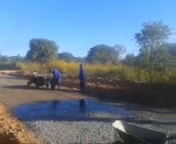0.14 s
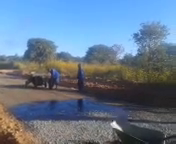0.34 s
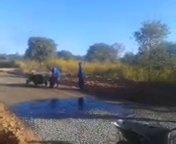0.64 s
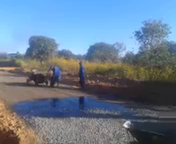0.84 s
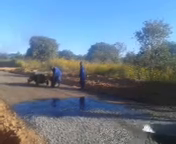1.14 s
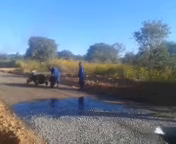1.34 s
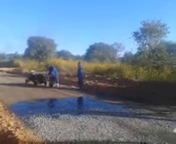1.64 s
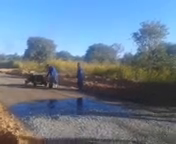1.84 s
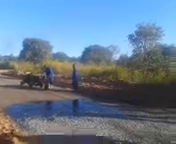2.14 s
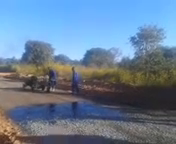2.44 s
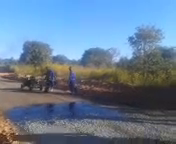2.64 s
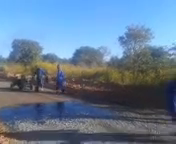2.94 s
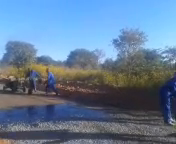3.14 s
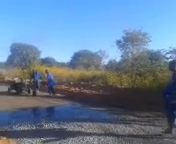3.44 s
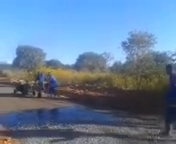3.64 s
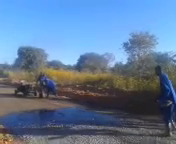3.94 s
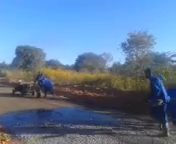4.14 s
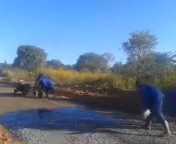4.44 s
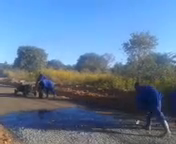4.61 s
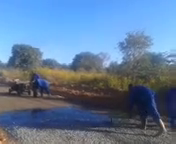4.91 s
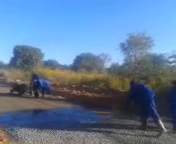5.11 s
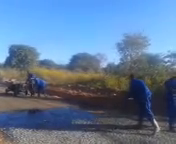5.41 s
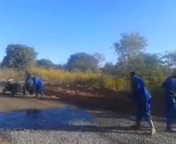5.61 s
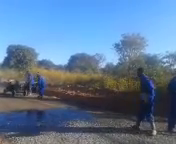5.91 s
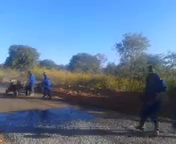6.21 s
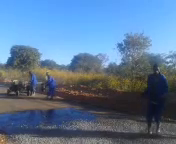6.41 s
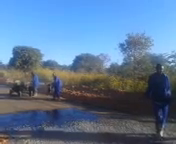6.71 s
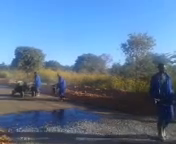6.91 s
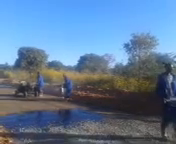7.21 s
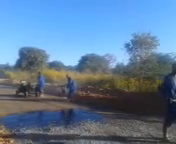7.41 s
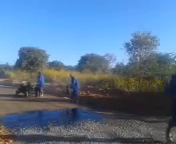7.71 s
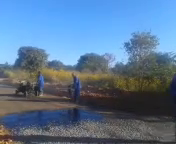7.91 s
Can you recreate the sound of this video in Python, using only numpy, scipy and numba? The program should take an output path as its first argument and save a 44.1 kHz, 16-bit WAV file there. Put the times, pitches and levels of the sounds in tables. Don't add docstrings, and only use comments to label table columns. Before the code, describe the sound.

Loose gravel scrapes, pours and lands in uneven bursts, with steel faintly ringing under sliding stones. The busiest shovelling comes first; afterward single stones tick and clack between lulls. Another grainy throw arrives around five seconds, then footsteps-like bumps, then a bright cracking spill near the end. Open air, no reverberation, phone microphone at a few metres, soft distant hiss and faint rumble.

```python
import sys
import numpy as np
from scipy import signal
from scipy.fft import rfft, irfft, next_fast_len
from scipy.io import wavfile
from scipy.ndimage import uniform_filter1d
from numba import njit

SR = 44100
rng = np.random.default_rng(int(sys.argv[2]) if len(sys.argv) > 2 else 0)


def to_wav(s):
    ch = np.atleast_2d(s).T
    pcm = np.round(np.clip(ch, -1, 1) * 32767)
    wavfile.write(sys.argv[1], SR, pcm.astype(np.int16))


def amplitude_ratio(level_db):
    exponent = np.asarray(level_db, float) / 20
    return 10 ** exponent


N = 355446

# f/Hz, level/dB
COLOUR = [(65, -64.5), (110, -35.5), (227, -13.5), (289, -8.5), (494, -3.5), (843, -13), (1090, -7.5),
          (1370, -7.5), (1600, -12), (2180, -9), (2920, -8), (4120, -7.5), (5070, -7), (6800, -10.5),
          (8840, -46), (15000, -120)]
# f/Hz, level/dB
RUMBLE = [(15, -0.5), (40, -7), (62, -5), (80, -15.5), (105, -40), (200, -58.5), (500, -110)]
# f/Hz, level/dB
PHONE_EDGE = [(6800, 0), (7100, -4), (7500, -12), (7900, -18), (8030, -30), (8300, -17), (8600, -24),
              (8900, -29), (9150, -40), (9300, -80)]

# t/s, level/dB
BLADE_KNOCKS = [
    (.234, -35),
    (6.912, -35.5),
]
# f/Hz, level/dB, t60/s
BLADE_MODES = [(641, -8.5, 0.17), (5700, -7, 0.081), (1850, -7.5, 0.24), (1980, -6.5, 0.17),
               (2450, -5.5, 0.17), (3600, -10, 0.1)]
# t/s, level/dB
CLINKS = [
    (3.354, -42),
    (3.3575, -42),
    (3.3615, -37.5),
]
# f/Hz, level/dB, t60/s
CLINK_MODES = [(2510, -18, 0.081), (2660, 0, 0.056), (2990, -13, .05), (3270, -3, 0.045), (4250, -6, .04),
               (5050, -12, 0.04)]
# f/Hz, width/Hz, level/dB
SCRAPE_MODES = [(506, 18, -11), (1125, 13, -9), (2136, 76, -6.5), (2390, 18, -6.5), (3290, 25, -9.5),
                (4040, 190, -10), (4900, 130, -15)]
# t/s, peak level/dB, f/Hz
TOCKS = [(0.781, -14.5, 532), (.782, -19, 1356), (2.414, -31, 1120), (4.525, -27.5, 517), (1.993, -31, 496),
         (7.198, -34, 577), (7.516, -24, 474), (7.532, -23, 546), (7.948, -28, 376), (.236, -26, 512),
         (.237, -22, 2200), (.29, -27, 510), (2.03, -27, 500), (2.06, -29, 520), (2.262, -36, 1166),
         (2.5, -33.5, 496), (2.71, -42, 2100), (2.714, -43, 1600), (3.441, -42, 2871), (3.452, -41, 2900),
         (.884, -27, 3800), (1.702, -35, 4980), (3.342, -46, 2950), (.897, -24, 3350), (.906, -26, 3380),
         (.921, -28, 3400), (5.0, -29, 4900), (5.004, -29, 5540), (5.057, -31, 2810), (5.205, -30, 4700),
         (6.916, -35, 5200), (4.728, -38, 500), (5.3, -26, 2360), (5.36, -30, 2200), (5.46, -28, 1170),
         (4.93, -28, 1830), (4.945, -34, 1870), (4.86, -41, 2800), (.43, -36, 2250), (1.0, -33, 4070),
         (1.06, -33, 4250), (6.876, -42, 3680), (6.915, -42, 3500), (7.112, -35, 495), (7.59, -30.5, 2410)]
# t/s, peak level/dB, f/Hz
CRACKS = [(0.0274, -33, 4220), (0.2341, -23, 4260), (.309, -30, 2620), (.207, -35, 2400),
          (1.5487, -29.5, 3020), (1.607, -32, 2380), (1.7004, -35, 4000), (1.784, -39, 5430),
          (1.936, -35, 2300), (1.941, -36, 4180), (2.0204, -33, 4350), (2.05, -30, 3200),
          (2.0438, -29, 2620), (2.3431, -35, 4230), (2.4138, -28, 3600), (2.826, -33, 4060),
          (2.839, -35, 3060), (2.856, -28, 4500), (3.05, -38, 4520), (3.11, -37, 3600), (4.258, -36, 4900),
          (4.35, -34, 4900), (4.5232, -25.5, 4120), (4.5255, -28, 4600), (4.721, -30, 5080),
          (4.7262, -29.5, 4820), (4.733, -33, 4040), (5.788, -38, 2750), (5.994, -42, 2130),
          (0.679, -31, 3960), (0.699, -34, 3200), (.916, -27, 4300), (1.051, -30, 4230), (1.17, -32, 4500),
          (1.273, -32, 4230), (1.425, -35.5, 3380), (5.21, -31, 4600), (5.365, -31, 4000),
          (5.39, -24, 2180), (5.41, -30, 2450), (7.571, -31, 3500), (6.912, -30, 4640), (7.111, -40, 4700),
          (7.197, -38, 5640), (7.483, -37, 4370)]
# t/s, peak level/dB, f/Hz
THUDS = [(.219, -44, 465), (.411, -29.5, 516), (.477, -29, 520), (1.03, -31, 503), (1.12, -29, 504),
         (1.145, -26, 520), (1.175, -29, 495), (1.318, -33, 395), (1.51, -32, 499), (1.689, -39.5, 482),
         (1.801, -36, 606), (2.288, -40, 397), (2.465, -36, 494), (2.778, -37.5, 458), (2.795, -41, 450),
         (2.837, -28.5, 475), (2.94, -36, 333), (3.47, -43, 504), (4.374, -34, 596), (4.901, -28, 330),
         (2.006, -30.5, 490), (5.151, -31.5, 340), (5.31, -24.5, 520), (5.383, -21, 642), (5.872, -35, 583),
         (6.325, -41, 480), (6.636, -33, 420), (6.7, -37, 435), (7.238, -43, 430), (6.766, -36, 480)]

# t/s, peak level/dB, clack f/Hz, thud level above peak/dB
THUMPS = [(0.0567, -31.5, 4900, 0.5), (.2069, -38, 2390, 2), (0.2342, -10.5, 2280, -1),
          (.343, -24, 2980, -15), (.414, -28, 2200, -14), (1.358, -23.5, 6500, -0.5), (1.493, -25, 2100, 0),
          (1.5894, -36, 3080, -2), (1.607, -32, 2330, -2), (1.8368, -30, 2210, 3), (1.926, -31, 2680, -3),
          (1.992, -26.5, 1470, -3), (2.0202, -23, 4230, 3.5), (2.0439, -19, 2140, -2),
          (2.126, -38, 4430, -6.5), (2.272, -34, 3500, 2), (2.3185, -30, 5200, -6), (2.837, -28, 3450, -17),
          (4.192, -35, 3650, -13), (4.5238, -27.5, 4300, 2.5), (4.889, -32, 1970, 6), (4.905, -26, 3930, 3),
          (6.4194, -33, 5600, 0), (6.4388, -26, 2150, -7), (6.697, -33, 2020, -6), (6.766, -26, 3000, -5),
          (6.786, -30, 3480, -8), (6.911, -24, 1870, -8), (7.196, -31, 3810, -2), (7.2505, -33.5, 3480, -2)]
# t/s, peak level/dB, clack f/Hz, t60/s
CLACKS = [(0.0266, -24.5, 3900, 0.028), (.309, -26.5, 2920, 0.087), (0.434, -24, 2500, 0.09),
          (0.7818, -16, 1850, 0.057), (0.884, -22, 4050, 0.047), (0.9176, -17.5, 3600, .08),
          (1.169, -23, 4700, 0.077), (1.266, -25.5, 1470, 0.053), (1.417, -25, 3420, 0.063),
          (1.4575, -26.5, 4130, .07), (1.5479, -28.5, 2750, 0.051), (1.7, -28, 4760, 0.076),
          (1.729, -29, 4740, 0.063), (2.3428, -29.5, 3730, 0.05), (2.4127, -25, 2280, 0.087),
          (2.827, -33, 2050, 0.076), (3.049, -29.5, 4550, 0.054), (3.1095, -30, 3500, 0.055),
          (3.356, -32, 3500, 0.077), (4.237, -28, 5060, 0.16), (4.371, -25.5, 2800, 0.073),
          (4.556, -31, 3700, 0.12), (4.7188, -29, 4820, 0.067), (7.111, -28.5, 4900, 0.053),
          (7.4833, -31, 4700, 0.022), (7.511, -17, 4450, 0.093), (7.524, -12.5, 4700, 0.12),
          (7.676, -32, 4600, 0.036), (7.949, -21.5, 5000, 0.079), (7.9714, -30, 5117, 0.045)]
# t/s, peak level/dB, f/Hz
PEBBLES = [(0.1208, -31, 4170), (.5068, -39, 3900), (1.3193, -28.5, 3970), (1.784, -33, 5200),
           (1.936, -36, 2120), (2.204, -31, 2840), (2.37, -29.5, 4790), (2.39, -32, 5200),
           (2.671, -33, 3600), (3.0994, -33.5, 4900), (3.89, -35, 4600), (4.443, -29, 2450),
           (4.634, -36.5, 4230), (4.7987, -35, 5260), (4.846, -32.5, 2860), (5.053, -27, 2840),
           (5.787, -33, 2770), (6.645, -33.5, 2450), (6.913, -23.5, 3640), (7.0595, -40, 2020),
           (7.197, -26.5, 6400), (7.183, -39, 2040), (7.783, -34, 4370), (5.993, -35, 2040),
           (7.8166, -44, 2170), (7.868, -35.5, 4860), (7.885, -35, 2310)]
# t/s, peak level/dB
BUMPS = [(2.24, -53), (2.483, -35), (2.959, -43), (3.549, -36), (3.711, -38.5), (4.099, -45), (4.215, -37),
         (4.373, -24.5), (4.636, -40), (5.608, -22.5), (5.748, -31.5), (5.871, -29), (5.971, -34),
         (6.211, -30.5), (6.53, -34), (6.632, -28), (7.04, -46), (7.434, -40), (7.724, -27.5), (7.85, -42)]
# t/s, peak level/dB, f/Hz
TICKS = [(1.665, -37, 2350), (1.8813, -32, 2360), (1.9065, -37, 4030), (2.229, -32, 5160),
         (2.328, -32, 4960), (2.656, -35.5, 4960), (2.689, -33, 4000), (2.728, -42, 2290),
         (2.7612, -39, 4640), (2.9762, -43, 3320), (3.1443, -38, 5010), (3.215, -45, 2330),
         (3.342, -48, 3030), (3.4172, -46, 3920), (3.451, -45, 5000), (3.5916, -42, 5040),
         (3.7115, -48, 5090), (3.7499, -36, 2770), (4.034, -43, 2140), (4.1684, -40, 4860),
         (4.812, -39, 4970), (5.9567, -44, 2260), (6.242, -40.5, 2200), (6.3505, -44, 2060),
         (6.7423, -39, 4190), (6.9821, -34, 6560), (7.4246, -44, 2300), (7.571, -18.5, 3500),
         (7.589, -24, 2520), (7.681, -29, 4530), (7.689, -37, 4030)]

# t/s, trickle level/dB, share of fines/dB, depth of loose bed/dB
HEAP = [(0.0, -45.5, -6.5, -6), (.38, -51.5, -15, 6), (.43, -52, -2.5, 2.5), (.85, -50, -5.5, -7),
        (.92, -50, -10, 5), (1.2, -47, -7.5, -2), (1.5, -56.5, 0, -3.5), (1.72, -45.5, -12, 0.5),
        (2.0, -49, -11.5, 4), (2.35, -47, -12.5, 3.5), (2.65, -50.5, -7.5, -0.5), (3.25, -55.5, -6, 0),
        (4.8, -55, -7, -1), (4.92, -62, -2, 2), (5.5, -60, -6, -15), (6.75, -66, 1.5, -2),
        (6.95, -62.5, -2.5, -9.5), (8.06, -56.5, -7.5, 3.5)]
# start t/s, end t/s, start level/dB, end level/dB, weight/dB
SLIDES = [(0.233, 0.281, -30, -34, -6.5), (0.307, 0.389, -44, -40, -3), (0.423, 0.764, -36.5, -29.5, -3.5),
          (0.787, 0.859, -29, -33.5, -5), (0.961, 1.183, -34.5, -34.5, -4), (1.217, 1.628, -40, -48.5, 0),
          (3.45, 3.604, -53.5, -52, -19), (3.724, 3.788, -47.5, -46.5, -2), (7.427, 7.442, -52, -64, 4),
          (4.229, 4.282, -41.5, -36.5, -8), (4.307, 4.353, -45, -38, -6), (4.384, 4.417, -38, -41.5, -2.5),
          (4.902, 5.009, -31.5, -35, -14.5), (5.045, 5.13, -39, -41, -23), (5.398, 5.533, -32.5, -35.5, 2),
          (7.585, 7.747, -37.5, -48.5, -8), (7.959, 8.1, -30, -32, -7)]
# start t/s, end t/s, start level/dB, end level/dB, weight/dB
SPILLS = [(0.209, 0.22, -45, -43, -2), (0.886, 0.95, -30, -30, -10), (2.258, 2.34, -47.5, -39, -2),
          (2.705, 2.8, -46, -48, -9), (2.826, 2.861, -35, -31.5, -4), (2.875, 2.88, -41, -43.5, -8),
          (3.12, 3.07, -43, -43, -14), (4.722, 4.737, -32, -37, -20), (4.826, 4.845, -52, -46, -18),
          (4.847, 4.895, -45, -45.5, -14), (6.893, 6.91, -47, -40, -18), (6.993, 7.005, -55, -58, -6),
          (7.182, 7.187, -46, -42, -3), (7.25, 7.26, -41.5, -45.5, -0.5), (7.509, 7.56, -27, -26.5, -5),
          (7.66, 7.7, -44, -45, -25)]
# peak t/s, rise per 10 dB/s, fall per 10 dB/s, level/dB, weight/dB
SWELLS = [(0.0, .05, -0.02, -27, -5), (.05, 2.9, 0.01, -41.5, -13), (.3, -0.07, 0, -46, 9),
          (1.152, -0.06, -0.02, -40.5, 12), (1.716, -0.32, 0.01, -37.5, -1), (2.051, 0.04, 0.02, -35, 1.5),
          (2.135, 0.1, -0.24, -40, -4.5), (2.21, -0.04, -0.3, -46, -4), (2.33, 0.05, -0.1, -42, -3),
          (2.48, 0.04, 0.08, -38, -14), (2.55, -0.07, -0.1, -41, -11), (2.6, 0, -0.6, -51.5, -11),
          (2.79, -0.1, 0, -44, -6), (2.92, -1.2, 0.2, -47.5, -0.5), (3.54, 0.13, 0.1, -54.5, 6),
          (3.8, 0.24, 0.16, -53, 1), (4.1, 0.06, .08, -48.5, 1.5), (4.21, -0.09, -0.13, -38.5, -10),
          (4.47, -0.08, 0, -41, -4), (4.56, 0.08, -0.16, -44.5, 5), (4.634, 0.17, -0.34, -52, 5),
          (4.74, 0.4, -3.5, -51, -4), (5.362, 0.2029, 0.0741, -28, -4), (5.628, 0, 0, -40, 5),
          (5.69, 1, -1.5, -51, -1), (5.79, 0.16, 0.4, -51.5, 5), (6.52, 0.22, 0.09, -44, 4.5),
          (6.645, 0.24, .05, -49, 5), (6.794, 0.13, 0.38, -48.5, 5.5), (6.934, -0.65, 0.2, -52, 2),
          (7.24, -0.47, 0, -49, 3), (7.34, .06, -0.35, -58.5, 2), (7.82, 0, 0.1, -50.5, 2)]


def level(x, db):
    return x * amplitude_ratio(db) / np.sqrt(np.mean(x ** 2))


def colour(x, points):
    hz, db = np.transpose(points)
    size = next_fast_len(N + SR)
    bins = np.arange(4097) * SR / 8192 + 1
    cep = irfft(np.interp(np.log(bins), np.log(hz), db) * np.log(10) / 20)
    cep[1:4096] *= 2
    cep[4097:] = 0
    response = irfft(np.exp(rfft(cep)))
    return irfft(rfft(x, size) * rfft(response, size), size)[:N]


def stone_colour(x):
    return colour(x, COLOUR[:-2])


@njit
def damped_sines(start, hz, t60, size):
    out = np.zeros(N)
    for k in range(len(start)):
        p = np.exp(2j * np.pi * hz[k] / SR - np.log(1000) / (t60[k] * SR))
        z = size[k] + 0j
        for i in range(max(start[k], 0), min(N, start[k] + int(t60[k] * SR))):
            out[i] += z.imag
            z *= p
    return out


def ring(s, hz, t60, size):
    rows = np.broadcast_arrays(s, hz, t60, size)
    s, hz, t60, size = (np.array(r, float, order="C").ravel() for r in rows)
    return damped_sines((s * SR).astype(np.int64), hz, t60, size)


def grains(s, hz, cycles, size):
    hz = np.clip(hz, 60., 9000.)
    return ring(s, hz, cycles / hz, size * np.sqrt(hz / 3000))


def walk(rate):
    k = int(SR / rate)
    held = np.repeat(rng.standard_normal(N // k + 1), k)
    return 1.63 * uniform_filter1d(held, k)[:N]


def outdoors():
    hiss = stone_colour(rng.standard_normal(N))
    return level(hiss * amplitude_ratio(walk(2.6)), -59)


def strike(knocks, modes):
    s, db = np.array(knocks).T[:, :, None]
    hz, mode_db, t60 = np.tile(np.transpose(modes), 2)
    detune, uneven = rng.standard_normal((len(knocks), 2, len(hz))).transpose(1, 0, 2)
    return ring(s, hz * (1 + 0.0083 * detune), np.minimum(t60, .3), amplitude_ratio(db + mode_db + 1.6 * uneven))


def tocks():
    s, db, hz = np.transpose(TOCKS)
    return ring(s, hz, 0.03 + 20 / hz, amplitude_ratio(db))


def cracks():
    s, db, hz = np.transpose(CRACKS)[:, :, None]
    stagger_s = .0015 * np.array([2, 0, 0, 1, 1])
    partials = 1 + .22 * np.array([-1, -.37, 0, .56, 1])
    return ring(s + stagger_s, hz * partials, 0.018, amplitude_ratio(db - 2.5))


def hollow_thuds():
    s, db, hz = np.transpose(THUDS)[:, :, None]
    return ring(s + np.array([0, .004]), hz * np.array([1, .93]), .09, amplitude_ratio(db - 4.5))


def blade_and_stones():
    steel = strike(BLADE_KNOCKS, BLADE_MODES) + strike(CLINKS, CLINK_MODES)
    stones = tocks() + cracks() + hollow_thuds()
    no_bass = signal.butter(4, 300, "high", fs=SR, output="sos")
    return signal.sosfilt(no_bass, steel + stones)


def landings():
    hard_thud_db = -24.5
    rows = [(s, db, hz, thud_db, .08) for s, db, hz, thud_db in THUMPS]
    rows += [(s, db, hz, hard_thud_db, t60) for s, db, hz, t60 in CLACKS]
    rows += [(s, db, hz, -18, .07) for s, db, hz in PEBBLES]
    rows += [(s, db - 9.5, 1100, 14.5, .06) for s, db in BUMPS]
    rows += [(s, db, hz, hard_thud_db, 0.033) for s, db, hz in TICKS]
    columns = np.array(rows).T[:, :, None]
    grit_db = -14.5 - 1.5 * np.log2(columns[2] / 3500)
    return *columns, grit_db


def clumps(count=140):
    s, db, hz, thud_db, t60, grit_db = landings()
    t60 = np.clip(t60, .005, .4)
    late, pitch, tuned, size, sign = rng.random((len(s), 5, count)).transpose(1, 0, 2)
    late = late ** 1.4
    fade_db = 42 * late
    bulk = np.clip(.6 + late * t60 / .006, 0, 1)
    size = bulk * amplitude_ratio(db - fade_db - 0.67 * np.log(1 - size)) * np.sign(sign - .5)

    lead = np.arange(count) < 4
    lead_size = amplitude_ratio(db - 0.5) * (0.054 / t60) ** 1.1
    tuned = (tuned < .2) | lead
    clack_hz = np.where(tuned, hz * (0.88 + .24 * pitch), 1100 + 6900 * pitch)
    lean_db = (grit_db + 8.5) * np.clip(1.6 * pitch - .4, -.3, 1) - 9 * (pitch < .12)
    lean_db = np.where(tuned, 0, lean_db)
    cycles = np.where(lead, 16., np.where(tuned, 35., 18.))
    clack_s = s + late * t60 * np.where(lead, .03, 1)
    clack_size = np.where(lead, lead_size, size * amplitude_ratio(lean_db + 1.5))
    clack = grains(clack_s, clack_hz, cycles, clack_size)

    thud_s = s + 0.0036 + late * t60 * 1.6
    thud = grains(thud_s, 290 + 480 * pitch, 3.27, size * amplitude_ratio(thud_db + 4.0))
    return stone_colour(clack + thud)


def curves(table):
    s, *columns = np.transpose(table)
    return [np.interp(np.arange(N) / SR, s, c) for c in columns]


def peak(t, start, end, start_db, end_db, rise, fall):
    before = np.maximum(start - t, 0) / max(rise, .002)
    after = np.maximum(t - end, 0) / max(fall, .004)
    return np.interp(t, [start, end], [start_db, end_db]) - 10 * (before + after)


def work():
    t = np.arange(N) / SR
    trickle_db, fines_db, depth_db = curves(HEAP)
    moves = [(trickle_db, -4.5)]  # level/dB, weight/dB
    # rise and fall per 10 dB, in s
    moves += [(peak(t, a, b, a_db, b_db, 0.0087, 0.032), w) for a, b, a_db, b_db, w in SLIDES]
    moves += [(peak(t, a, b, a_db, b_db, 0.0019, 0.016), w) for a, b, a_db, b_db, w in SPILLS]
    moves += [(peak(t, s, s, db, db, rise, fall), w) for s, rise, fall, db, w in SWELLS]
    power = amplitude_ratio(2 * np.array([move_db for move_db, _ in moves]))
    weight_db = np.array([w for _, w in moves])

    def total(gain_db):
        return 10 * np.log10(amplitude_ratio(2 * gain_db) @ power)

    clatter_db = total(0 * weight_db)
    roll_db = total(-5 + 0.6 * weight_db) - 0.33 * depth_db
    return clatter_db + fines_db, clatter_db, roll_db, total(weight_db), depth_db


def slips(count, spread_db, t60):
    when, size = rng.random((count, 2)).T
    kicks = np.zeros(N)
    kicks[(when * N).astype(int)] = amplitude_ratio(-spread_db * np.log(1 - size))
    return 1.5 + signal.lfilter([1], [1, -np.exp(-np.log(1000) / (t60 * SR))], kicks)


def stream(lo_hz, hi_hz, cycles, spread_db, surge, count):
    s, pitch, size, sign, hard = rng.random((count, 5)).T
    cycles = cycles * amplitude_ratio(-4.5 * np.log(1 - hard))
    size = amplitude_ratio(-spread_db * np.log(1 - size)) * np.sign(sign - .5) / np.sqrt(cycles)
    shower = grains(s * N / SR, lo_hz + (hi_hz - lo_hz) * pitch, cycles, size)
    shower = stone_colour(shower) * surge
    slow_power = uniform_filter1d(uniform_filter1d(shower ** 2, SR // 8), SR // 8)
    return shower / np.sqrt(slow_power)


def blade_song(stones, clatter_db):
    song = np.zeros(N)
    for hz, width, db in SCRAPE_MODES:
        song += amplitude_ratio(db) * signal.lfilter(*signal.iirpeak(hz, hz / width, fs=SR), stones)
    return amplitude_ratio(0.2 * (clatter_db + 32)) * song


def gravel():
    grit_db, clatter_db, roll_db, bed_db, depth_db = work()
    sparse = np.clip((-24 - clatter_db) / 20, .5, 1.2)
    slide = slips(count=500, spread_db=.7, t60=.04) ** sparse
    grit_surge = slide * amplitude_ratio(0.92 * sparse * walk(30))
    clatter_surge = slide * amplitude_ratio(1.1 * sparse * walk(30))
    roll_surge = slide ** 0.42 * amplitude_ratio(2.2 * sparse * walk(30))
    bed_surge = slide ** 0.89 * amplitude_ratio(1.2 * sparse * walk(20))

    grit = stream(5200., 8000., 51.0, 0.82, grit_surge, count=35000)
    clatter = stream(1750., 5320.0, 17.7, 0.66, clatter_surge, count=45000)
    roll = stream(780., 1950., 11.4, 1.7, roll_surge, count=16000)
    bed = stream(300., 895.0, 7.2, 1.96, bed_surge, count=6500)
    deep_bed = stream(110., 314.0, 5.5, 2.1, slide ** 0.39, count=1700)
    bed = bed + amplitude_ratio(depth_db - 7.5) * deep_bed
    rattle = stream(1800., 2600., 25., 1.8, slide, count=6000)
    chink = stream(600., 5200., 100., 3.3, slide, count=3500)

    stones = amplitude_ratio(grit_db) * grit + amplitude_ratio(clatter_db) * clatter
    stones += amplitude_ratio(roll_db) * roll + amplitude_ratio(bed_db - 1.0) * bed
    stones += amplitude_ratio(roll_db - 7.5) * rattle + amplitude_ratio(clatter_db - 8) * chink
    return stones + blade_song(stones, clatter_db)


def scene():
    return (outdoors() + blade_and_stones() + clumps() + gravel())[None]


def roll_off(x):
    return signal.sosfilt(signal.butter(12, 9200, fs=SR, output="sos"), x)


def record(dry):
    phone_sr = 16000
    low_pass = signal.cheby2(12, 60, 8300, fs=SR, output="sos")
    x = signal.sosfilt(low_pass, dry[0])
    mirror = 1 + np.cos(2 * np.pi * phone_sr * np.arange(N) / SR)
    x = colour(x * mirror, PHONE_EDGE)
    rumble = level(colour(rng.standard_normal(N), RUMBLE), -67)
    x = signal.lfilter(*signal.iirnotch(103., 2.5, fs=SR), x + rumble)
    x = x + .0005
    return roll_off(x[None])


dry = scene()
out = record(dry)
to_wav(out)
```